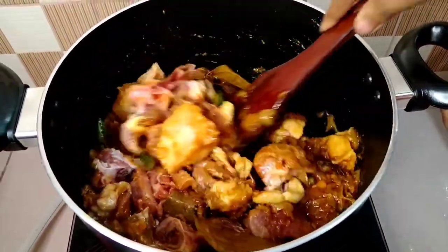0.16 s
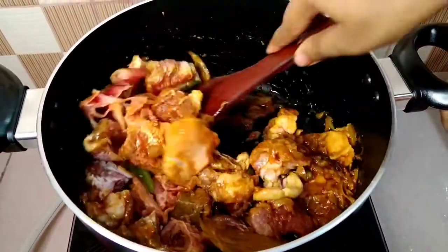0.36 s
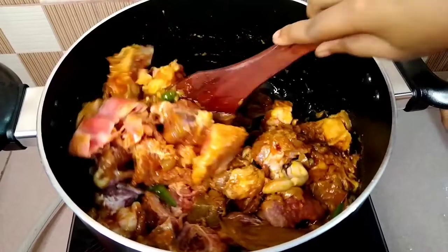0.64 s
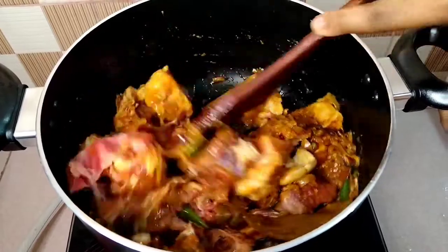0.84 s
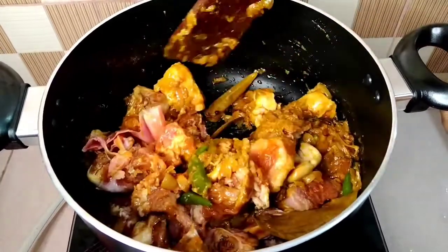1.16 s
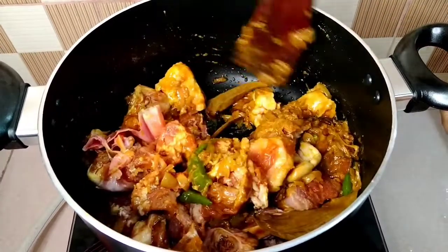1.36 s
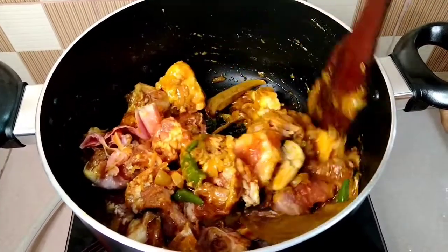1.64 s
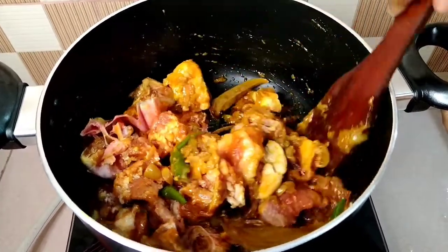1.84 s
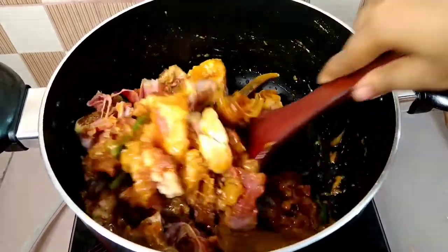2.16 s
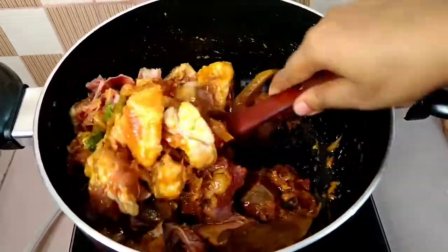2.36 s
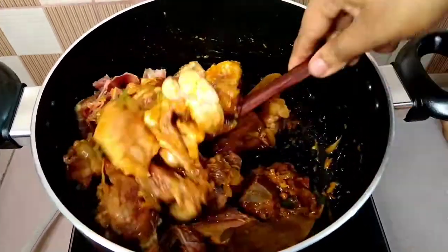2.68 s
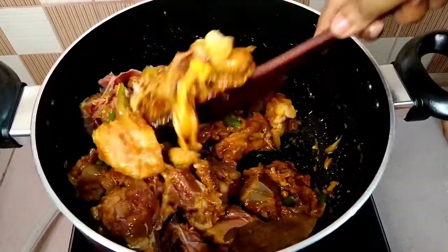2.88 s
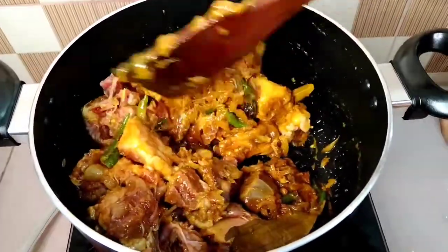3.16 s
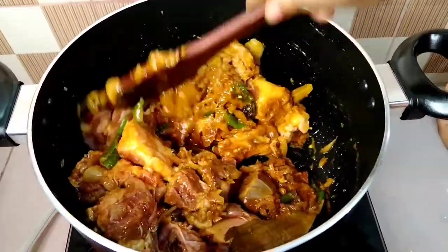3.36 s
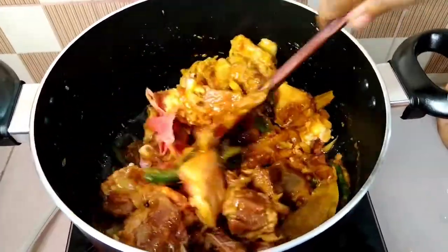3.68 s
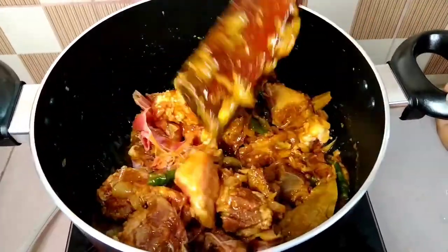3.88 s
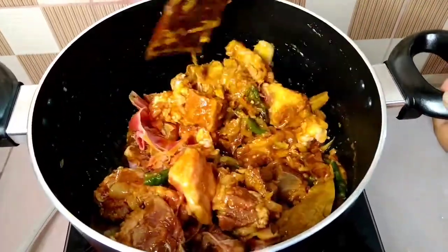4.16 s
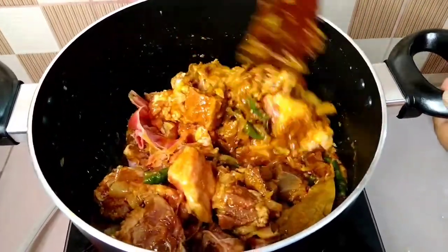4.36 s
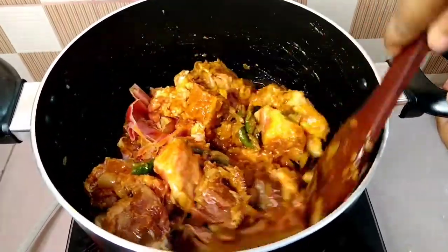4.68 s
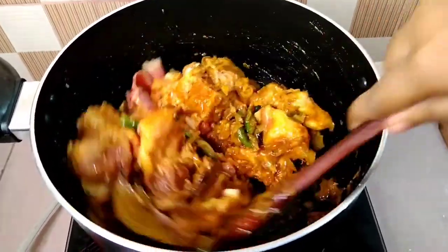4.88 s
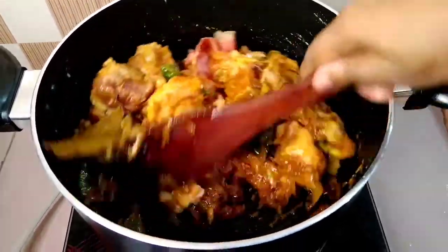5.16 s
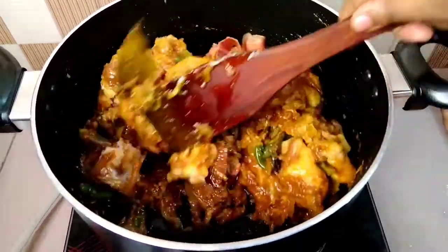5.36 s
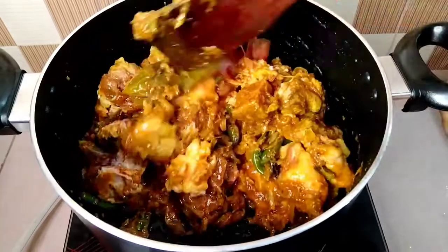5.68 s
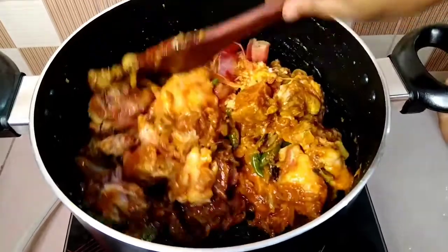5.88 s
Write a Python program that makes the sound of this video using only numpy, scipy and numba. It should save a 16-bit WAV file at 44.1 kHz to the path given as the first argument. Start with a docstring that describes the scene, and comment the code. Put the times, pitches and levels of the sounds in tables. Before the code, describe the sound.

Close in a small tiled kitchen, a wooden spatula turns wet meat in a nonstick pot. It scrapes, squeaks faintly and taps the wall, rubs faster, then strikes the base with a loud ringing clonk. A wet plop, light knocks and quick scrapes follow, then a soft ending. Hot sauce sizzles softly and spits over a low wavering hum and thin whine; quiet sounds are slightly patchy from noise suppression.

```python
"""A wooden spatula turns wet pieces of meat in a nonstick pot on a cooktop, close by in a small kitchen.
Its blade scrapes in strokes (tiny random slips ring the blade, pot and sauce), knocks on the base and wall
(noise cracks and ringing modes), and squeaks and chirps faintly.
Wet squelches are runs of bubbles; the hot sauce sizzles softly and spits with short bursts of noise.
Underneath, the cooktop hums low with a thin electric whine, and there is still air."""
import sys
import numpy as np
from scipy import signal
from scipy.fft import rfft, irfft
from scipy.io import wavfile
from scipy.ndimage import uniform_filter1d
from numba import njit

SR = 44100
rng = np.random.default_rng(int(sys.argv[2]) if len(sys.argv) > 2 else 0)


def bounce(signal):
    """Save signal as a 16-bit WAV file at the path given by the first command-line argument."""
    frames = np.transpose(np.atleast_2d(signal))
    limited = np.clip(frames, -1, 1)
    pcm = np.round(limited * 32767).astype(np.int16)
    wavfile.write(sys.argv[1], SR, pcm)


N = 265923  # length of the scene in samples
T = np.arange(N) / SR  # time of every sample, s
RING = T[:SR * 3 // 5]  # time within one blow, spit or room tail, s
BLIP = T[:SR // 6]  # time within one bubble, s
LOW_SPLIT_HZ, HIGH_SPLIT_HZ = 700, 2500  # borders of the low, middle and high parts of a sound

# Where the bass begins. The cooktop holds the base still, so the free wall gives more bass:
# (on the base [Hz], on the wall [Hz])
BASS_START_HZ = (534, 210)


def undb(db):
    """Decibels to gain."""
    return 10 ** (np.asarray(db) / 20)


def rms(x):
    """Root mean square, the effective loudness of a signal."""
    return np.sqrt(np.mean(x ** 2))


def unit(x):
    """Scale to rms 1."""
    return x / rms(x)


def between(ends, share):
    """A value part of the way from one end (0) to the other (1)."""
    return ends[0] + np.clip(share, 0, 1) * (ends[1] - ends[0])


def curve(points):
    """Join (time, value) points with straight lines, giving a value at every sample."""
    times, values = np.transpose(points)
    return np.interp(T, times, values)


def convolve(x, response):
    """Pass a sound through an impulse response."""
    return signal.fftconvolve(x, response)[:len(x)]


def colour(x, points, size=1024):
    """Give a sound the listed (Hz, dB) spectrum with a filter that never responds ahead of its input."""
    hz, db = np.transpose(points)
    f = np.maximum(np.fft.rfftfreq(size, 1 / SR), 1)
    wanted_db = np.interp(np.log(f), np.log(hz), db)
    # folding the cepstrum to one side makes the filter minimum-phase
    cepstrum = irfft(np.log(undb(wanted_db)))
    cepstrum[1:size // 2] *= 2
    cepstrum[size // 2 + 1:] = 0
    return convolve(x, irfft(np.exp(rfft(cepstrum))))


def edge(x, hz, kind):
    """Steeply cut the bass ("high") or the treble ("low")."""
    return signal.sosfilt(signal.butter(4, min(hz, .45 * SR), kind, fs=SR, output="sos"), x)


def registers(x):
    """Split a sound into its low, middle and high parts."""
    low = edge(x, LOW_SPLIT_HZ, "low")
    band = signal.butter(4, [LOW_SPLIT_HZ, HIGH_SPLIT_HZ], "band", fs=SR, output="sos")
    return low, signal.sosfilt(band, x), edge(x, HIGH_SPLIT_HZ, "high")


def resonate(x, hz, width):
    """One resonance with gain 1 at its centre."""
    return signal.lfilter(*signal.iirpeak(hz, hz / width, fs=SR), x)


@njit
def sweep(x, hz, q):
    """A resonance whose centre moves, with gain 1 at the centre."""
    y, band, low = np.empty(len(x)), 0., 0.
    for i in range(len(x)):
        g = np.tan(np.pi * hz[i] / SR)
        v = (band + g * (x[i] - low)) / (1 + g * (g + 1 / q))
        band, low, y[i] = 2 * v - band, low + 2 * g * v, v / q
    return y


def fade(t60, t=RING):
    """A decay that loses 60 dB in t60 seconds."""
    return np.exp(-np.log(1000) * t / t60)


def walk(rate):
    """Smooth random wandering with rms 1, drawing about `rate` new values a second."""
    k = int(SR / rate)
    steps = np.repeat(rng.standard_normal(N // k + 1), k)
    return unit(uniform_filter1d(steps, k)[:N])


def grains(rate, spread_db):
    """Random clicks, many small and a few large, about `rate` a second."""
    size = undb(spread_db * np.minimum(rng.exponential(size=N), 5))
    happens = rng.random(N) < rate / SR
    return unit(happens * size * rng.choice([-1, 1], N))


def tone(hz, width):
    """An unsteady tone with rms 1: noise through two equal narrow resonances."""
    return unit(resonate(resonate(rng.standard_normal(N), hz, width), hz, width))


def bubble(hz, t60=0.17, rise_s=0.0012):
    """A pocket of air opens in the sauce and rings, rising a little in pitch."""
    ringing = np.sin(2 * np.pi * hz * BLIP * (1 + BLIP / 10))
    return ringing * fade(t60, BLIP) * (1 - np.exp(-BLIP / rise_s))


def bubbles(low_hz, high_hz, count):
    """Bubbles of random moment, pitch and size."""
    out = np.zeros(N + len(BLIP))
    for when, pitch, size in rng.random((count, 3)):
        start = int(when * N)
        hz = low_hz * (high_hz / low_hz) ** pitch
        out[start:start + len(BLIP)] += undb(10 * size) * bubble(hz)
    return out[:N]


def pot(place, damping=1, neighbour_db=-7, neighbour_spread=0.04):
    """The pot's ring for a push between base (0) and wall (1), with unit energy; high modes die sooner.
    The food lying in the pot splits two weaker neighbours off each mode."""
    # ways the pot vibrates, one per column; the three rows are
    # (pitch [Hz], level struck on the base [dB], level struck on the wall [dB])
    modes = [(280, 354, 486, 574, 665, 763, 1034, 1083, 1124, 1152, 1289, 1350, 1376, 1445, 1497, 1642, 1840, 2025, 2177, 2390, 2750, 3482, 4307, 4563, 5280),
             (-30, -22, -3, 0, -4, -13, -2, 0, -1, -5, 1, -4, -4, -7, -5, -13, -9, -8, -14, -19, -25, -34, -32, -30, -18),
             (-7, -2, -7, -11, -9, -14, -11, 2, -6, -14, -18, -16, -12, 1, -6, -10, -9, -6, -9, -15, -4, -13, -3, -1, -9)]
    low_t60_s, damping_hz = .19, 2974  # undamped ring time of low modes; above this pitch they die sooner
    hz, base_db, wall_db = np.array(modes)
    t60 = low_t60_s / np.hypot(1, hz / damping_hz) / damping
    gains = undb(between((base_db, wall_db), place))
    neighbour = (neighbour_db, neighbour_spread)
    ring = 0
    for db, spread in [(0, 0), neighbour, neighbour]:
        detuned = hz * np.exp(spread * rng.standard_normal(len(hz)))
        signed = gains * undb(db) * rng.choice([-1, 1], len(hz))
        for mode_hz, mode_t60, gain in zip(detuned, t60, signed):
            ring = ring + gain * np.sin(2 * np.pi * mode_hz * RING) * fade(mode_t60)
    return ring / np.linalg.norm(ring)


def scrapes(ring_db=0, wet_db=0, sharpness=5.5, rasp_top_hz=3000):
    """Dense slips of the blade's edge ring the blade and the pot and burst pockets of air in the sauce. In each
    stroke the blade speeds up and slows down, and a resonance it excites (the blade's own, or the pot wall
    singing) can glide in pitch."""
    # strokes of the blade: (time of top speed [s], rise [s], fall [s], rumble level [dB], rasp level [dB], #
    # hiss level [dB], resonance level [dB], resonance pitch at top speed [Hz], glide [octaves/s], # place [0
    # base - 1 wall]); the resonance is the blade's own or, near 1450 Hz, the pot wall that the # blade sets
    # singing; levels are before the swell of speed and the wandering grip
    stroke_table = [(.03, 0.48, .3, -48, -52, -67.5, -48.5, 1303, 0.5, .75),
                    (1.28, 0.15, 0.47, -52, -50.5, -51.5, -51, 2680, -2.5, 1),
                    (1.81, 0.11, 0.18, -62, -52.5, -78, -64.5, 2750, -1, .4),
                    (1.875, 0.16, 0.081, -58, -60.5, -61, -51.5, 1000, -0.5, 0.058),
                    (1.974, 0.12, 0.13, -48.5, -46, -57, -46.5, 732, -1.5, 0.22),
                    (2.089, 0.11, .18, -46, -44.5, -54.5, -54.5, 1380, 0, 0.37),
                    (3.46, 0.48, .22, -65.5, -57, -64.5, -67.5, 2670, .5, 0.45),
                    (4.21, 0.16, .17, -47, -42, -41, -48, 1075, 2.5, 0.74),
                    (4.369, .12, 0.142, -54.5, -50, -54, -48.5, 1790, 3.5, 0.62),
                    (4.559, .16, 0.5, -83.5, -58.5, -57, -68, 924, -1.5, 1),
                    (4.725, .03, 0.15, -56.5, -47.5, -54, -52, 1413, 2, 0.32),
                    (4.86, 0.097, 0.097, -48.5, -49, -50, -47.5, 1490, -1.5, .9),
                    (4.98, 0.084, 0.17, -52, -65, -63, -64, 530, 1, 0.51)]
    # colour of wood rubbing on the coating: (frequency [Hz], level [dB])
    rub_colour = [(150, -26.5), (240, -12), (340, 0), (600, -5.5), (1100, 1.5), (1450, 7.5), (1900, 1),
                  (2800, -4.5), (3850, -17), (4400, -4.5), (6500, -4), (7500, -14.5), (8700, -24.5),
                  (15000, -38)]
    # where the hiss begins, lower on the wall so it is broader: (on the base [Hz], on the wall [Hz])
    hiss_start_hz = (3750, 2890)
    speed_power = 2.2  # amplitude grows as this power of the blade's speed

    slips = grains(rate=2500, spread_db=3.3)
    rub = unit(colour(slips, rub_colour))
    body = unit(convolve(rub, pot(place=.8, damping=1.5)))
    wet = unit(colour(bubbles(500, 8000, count=900), rub_colour))
    sound = rub + undb(ring_db) * body + undb(wet_db) * wet
    rasp = edge(sound, LOW_SPLIT_HZ, "high")
    rasp = edge(edge(rasp, rasp_top_hz, "low"), rasp_top_hz, "low")
    waver = np.exp(.03 * walk(40))
    grip = undb([1.6 * walk(40) for _ in range(4)])  # each part wanders in level by itself
    out = np.zeros(N)
    for s, rise_s, fall_s, *levels_db, hz, glide, place in stroke_table:
        on = (T > s - rise_s) & (T < s + fall_s)
        t = T[on] - s
        speed = np.cos(np.pi / 2 * np.interp(t, [-rise_s, 0, fall_s], [-1, 0, 1]))
        centre = hz * 2 ** (glide * t) * waver[on]
        blade = sweep(sweep(slips[on], centre, float(sharpness)), centre, float(sharpness))
        rumble = edge(sound[on], between(BASS_START_HZ, place), "high")
        rumble = edge(rumble, LOW_SPLIT_HZ, "low")
        hiss_hz = between(hiss_start_hz, place)
        hiss = edge(edge(sound[on], hiss_hz, "high"), hiss_hz, "high")
        parts = rumble, rasp[on], hiss, blade
        mix = sum(undb(db) * unit(part) * g[on] for db, part, g in zip(levels_db, parts, grip))
        out[on] += speed ** speed_power * mix
    return out


def sizzle(simmer_db=-2):
    """Fine fizz of the hot sauce, made of random clicks, and a simmer of tiny bubbles."""
    # loudness of the frying: (time [s], level [dB])
    sizzle_level = [(0, -56), (.35, -69.5), (.6, -65), (1.1, -73.5), (1.65, -62.5), (2.8, -67),
                    (3.6, -61.5), (3.8, -81), (4.5, -65.5), (5.4, -67.5), (6, -62)]
    # colour of the frying sauce: (frequency [Hz], level [dB])
    sauce_colour = [(300, -16.5), (2700, -27), (3600, -36), (4500, -5.5), (5500, 7), (6300, 11.5),
                    (7100, -10.5), (8500, -20), (15000, -25.5)]
    fizz = unit(colour(grains(rate=1200, spread_db=2.8), sauce_colour))
    fizz = fizz * undb(1.5 * walk(25))  # the fizz flickers in level
    simmer = unit(colour(bubbles(4000, 14000, count=900), sauce_colour))
    return unit(fizz + undb(simmer_db) * simmer) * undb(curve(sizzle_level))


def cooktop(whine_hz=6169, whine_db=-76, air_db=-74, hum_db=1, hum_width_hz=14):
    """A low hum, heard louder and softer over time, and a thin electric whine, both narrow noise, and still
    air."""
    # notes in the hum: (frequency [Hz], relative level [dB])
    hum_notes = [(40, -8.5), (77, -3.5), (104, -1.5), (150, -3.5)]
    # level of the hum over time, before hum_db is added: (time [s], level [dB])
    hum_level = [(2.15, -69.5), (2.7, -78), (3.5, -68), (3.73, -79.5), (4.26, -65), (5.3, -80.5),
                 (5.91, -71.5)]
    # colour of the still air: (frequency [Hz], level [dB])
    air_colour = [(25, -17), (100, -2.5), (600, -6.5), (2500, -10.5), (15000, -38.5)]
    hum = unit(sum(undb(db) * tone(hz, hum_width_hz) for hz, db in hum_notes))
    hum = hum * undb(hum_db + curve(hum_level))
    whine = undb(whine_db) * tone(whine_hz, 56)
    air = undb(air_db) * unit(colour(rng.standard_normal(N), air_colour))
    return hum + whine + air


def squeak(rough_db=-3):
    """The blade sticks and slips almost regularly, making a faint, rough whine.
    Its resonances bend with the push, and each flutters in level by itself."""
    # pushes that squeak: (start [s], length [s], average slip rate [1/s], level before the swell [dB])
    push_table = [(0.341, 0.44, 366, -57.5), (0.594, 0.598, 370, -59)]
    # what the squeak rings: (centre before bending [Hz], width [Hz], relative level [dB])
    ringing_body = [(313, 60, -10.5), (1090, 68, 2.5), (1448, 160, -5), (1853, 120, -2.5)]
    swell, arch_share = .45, .04  # how gradually it swells and fades; how much it quickens in mid-push

    out = np.zeros(N)
    for s, length_s, rate, db in push_table:
        on = (T > s) & (T < s + length_s)
        t = T[on] - s
        push = np.sin(np.pi * t / length_s)
        arch = 1 + arch_share * (push - 2 / np.pi)
        bend = arch * (1 + .012 * walk(14)[on])
        phase = np.cumsum(rate * bend * (1 + .05 * walk(200)[on])) / SR
        slips = unit(np.diff(np.floor(phase), prepend=0))  # one click per full turn of the phase
        slips = slips + undb(rough_db) * rng.standard_normal(len(t))
        whine = 0
        for hz, width, mode_db in ringing_body:
            ringing = sweep(sweep(slips, hz * bend, hz / width), hz * bend, hz / width)
            whine = whine + undb(mode_db + 2.5 * walk(35)[on]) * ringing
        out[on] += undb(db) * unit(whine) * push ** swell
    return out


def squelches(gap_s=0.018, step_db=-2.5, count=6, scatter=0.087, bubble_t60=0.035):
    """Wet pieces squelch and drop: quick runs of weakening bubbles, roughened by the thick sauce."""
    # (time [s], middle pitch [Hz], level of the first bubble before roughening [dB])
    squelch_table = [(.65, 985, -49.5), (3.182, 184, -39), (3.506, 2683, -42), (5.81, 194, -42.5),
                     (5.87, 158.1, -44)]
    out = np.zeros(N + len(RING))
    for s, hz, db in squelch_table:
        for k in range(count):
            start = int((s + k * gap_s * rng.uniform(.5, 1)) * SR)
            pitch = hz * np.exp(scatter * rng.standard_normal())
            out[start:start + len(BLIP)] += undb(db + k * step_db) * bubble(pitch, bubble_t60)
    rough = out[:N] * (1 + walk(400) / 2)
    return edge(rough, 110, "high")


def blows(crack_t60=0.055, crack_db=-3, clatter_t60=0.49, clatter_db=-10, contact_s=0.00038, cushion_t60=.25):
    """Each blow is a short woody crack, the pot's modes and a clatter of noise like dense, weak modes.
    Some rebound once. Food caught under the blade cushions it: the ring is duller and shorter."""
    # blows of the blade: (time [s], thud level [dB], ring level [dB], click level [dB],
    # place [0 base - 1 wall], rebound delay [s, 0 for none], cushion of food [0-1]);
    # levels are those of the first 20 ms
    blow_table = [(1.1504, -49.5, -41.5, -42, 0.93, 0.0098, 0), (1.2798, -47, -47.5, -51, 0.99, 0.0017, .7),
                  (1.411, -38.5, -39.5, -70, 0.86, 0.009, 0.7), (1.435, -47, -43.5, -76, 1, 0.0011, 1),
                  (1.508, -44, -39.5, -55.5, 1, 0, 0.6), (2.2464, -28, -18.5, -36, 0.012, 0.0019, 0.32),
                  (2.267, -40, -28.5, -51.5, 0.15, 0.012, 0), (3.1762, -40, -41.5, -48.5, 1, 0.012, 0),
                  (4.0171, -45.5, -50, -41.5, 0.56, 0.0006, 0), (4.1029, -50.5, -34.5, -32, 0.93, 0, 0.31),
                  (5.811, -67.5, -55, -85.5, 1, 0.0042, 0.85)]
    # colour of a blow's crack and clatter: (frequency [Hz], level [dB])
    crack_colour = [(100, -12), (330, 9.5), (600, 5.5), (840, -3), (1100, 6.5), (1500, 0), (2700, 2.5),
                    (3700, -15), (5000, -2.5), (6800, -8.5), (8500, -29), (15000, -47.5)]
    # top of a blow's ring: (bare wood [Hz], fully cushioned by food [Hz])
    ring_top_hz = (3020, 850)
    # level change in a rebound, which rings far less: (thud [dB], ring [dB], click [dB])
    rebound_db = (-2.5, -19.5, 0)

    def woody_noise(t60):
        """A dying burst of noise in the colour of the crack."""
        return unit(colour(rng.standard_normal(len(RING)) * fade(t60), crack_colour))

    out, attack = np.zeros(N + len(RING)), SR // 50
    for s, *levels_db, place, gap, cushion in blow_table:
        contacts = [(s, levels_db)]
        if gap > contact_s:
            contacts.append((s + gap, np.add(levels_db, rebound_db)))
        ring = unit(pot(place))
        envelope = (1 - np.exp(-RING / contact_s)) * fade(cushion_t60) ** max(cushion, 0)
        for when, strengths_db in contacts:
            crack = undb(crack_db) * woody_noise(crack_t60)
            clatter = undb(clatter_db) * woody_noise(clatter_t60)
            hit = (ring + crack + clatter) * envelope
            thud, middle, click = registers(edge(hit, between(BASS_START_HZ, place), "high"))
            parts = thud, edge(middle, between(ring_top_hz, cushion), "low"), click
            start = int(when * SR)
            for db, part in zip(strengths_db, parts):
                out[start:start + len(RING)] += undb(db) * part / rms(part[:attack])
    return out[:N]


def spits(t60=0.12, tail_db=-13, tail_t60=0.39, attack_s=0.006):
    """A droplet of hot sauce bursts with a wet tick of noise around its own pitch, then fizzles out."""
    # (time [s], pitch [Hz], level before the decay [dB])
    spit_table = [(1.285, 10820, -62), (1.658, 6208, -55.5), (2.777, 6420, -61), (2.843, 4500, -54),
                  (2.846, 11070, -68.5), (5.238, 2700, -64.5), (5.352, 5800, -55), (5.498, 6400, -60.5),
                  (5.631, 7000, -63), (5.784, 5900, -58), (5.943, 2680, -56.5)]
    envelope = (fade(t60) + undb(tail_db) * fade(tail_t60)) * (1 - np.exp(-RING / attack_s))
    out = np.zeros(N + len(RING))
    for s, hz, db in spit_table:
        width = hz * .16
        burst = resonate(resonate(rng.standard_normal(len(RING)), hz, width), hz, width)
        start = int(s * SR)
        out[start:start + len(RING)] += undb(db) * unit(burst) * envelope
    return out[:N]


def chirps(attack_s=0.006):
    """The blade's edge catches: short, rough notes start quickly and die away as it slips free."""
    # (start [s], length [s], pitch before wavering [Hz], level before fading and flutter [dB])
    chirp_table = [(2.608, 0.2, 1094, -60), (2.67, 0.1, 1711, -60.5), (2.843, 0.12, 1465, -61),
                   (2.947, 0.11, 1456, -50), (2.95, .09, 1060, -53), (3.358, 0.15, 1443, -64),
                   (3.506, 0.13, 930, -58), (4.646, 0.086, 1790, -53), (5.676, 0.21, 1530, -67.5),
                   (5.893, 0.35, 1505, -63), (5.911, 0.094, 955, -66)]
    waver = np.exp(.045 * walk(350))  # of pitch
    flutter = unit(undb(4 * walk(200)))  # of level
    out = np.zeros(N)
    for s, length_s, hz, db in chirp_table:
        on = (T > s) & (T < s + length_s)
        t = T[on] - s
        envelope = np.minimum(t / attack_s, 1) * (1 - t / length_s)
        note = unit(np.sin(2 * np.pi * np.cumsum(hz * waver[on]) / SR))
        out[on] += undb(db) * envelope * flutter[on] * note
    return out


def kitchen(x, first_echo_s=0.0025, t60=0.5, wet_db=-6):
    """Tiled walls add a short, bright tail, made of dying noise."""
    tail = rng.standard_normal(len(RING)) * fade(t60) * (RING > first_echo_s)
    return x + undb(wet_db) * convolve(x, tail / np.linalg.norm(tail))


def scene():
    """Everything that happens in the pot, heard in the room over the cooktop."""
    blade = scrapes() + squeak() + blows() + chirps()
    food = sizzle() + squelches() + spits()
    return (kitchen(blade + food) + cooktop())[None]


def suppress(x, depth_db=-9, margin_db=13, memory_s=0.0072, size=1024):
    """Noise suppressor: turns down every narrow band that is not clearly above its own quietest level."""
    hop = size // 4
    spectra = signal.stft(x, nperseg=size, noverlap=size - hop)[2]
    keep = np.exp(-size / 4 / SR / memory_s)
    power = signal.lfilter([1 - keep], [1, -keep], np.abs(spectra) ** 2)  # smoothed over time
    quiet = uniform_filter1d(np.percentile(power, 5, axis=1), size=9)[:, None]
    opening = 1 / (1 + (quiet * undb(margin_db) ** 2 / power) ** 2)  # near 0 quiet, near 1 loud
    gain = between((undb(depth_db), 1), opening)
    return signal.istft(spectra * gain, nperseg=size, noverlap=size - hop)[1][:len(x)]


def record(dry, top_hz=15600):
    """The recorder suppresses steady noise, which leaves quiet sounds patchy, and cuts the top steeply."""
    top_cut = signal.ellip(10, .2, 80, top_hz, fs=SR, output="sos")
    return signal.sosfilt(top_cut, suppress(dry[0]))[None]


dry = scene()
out = record(dry)
bounce(out)
```